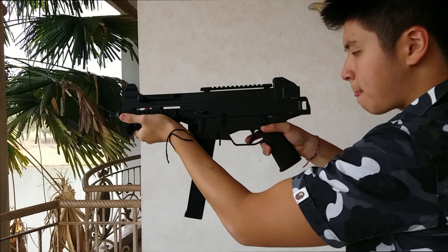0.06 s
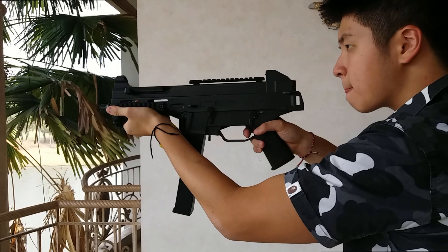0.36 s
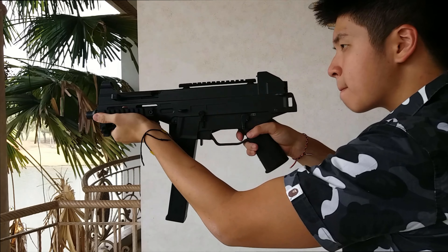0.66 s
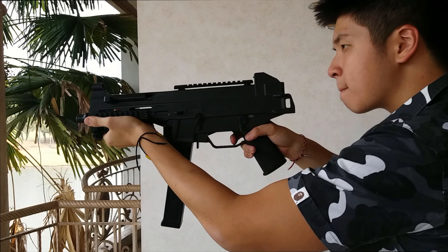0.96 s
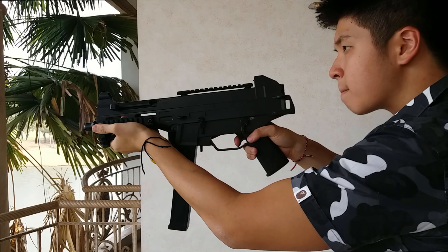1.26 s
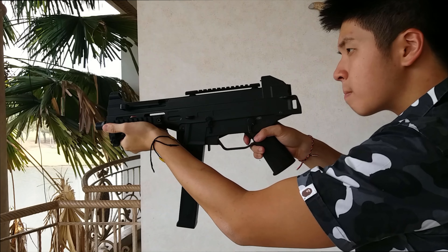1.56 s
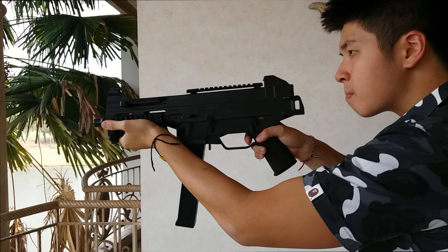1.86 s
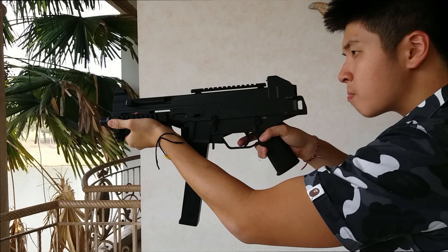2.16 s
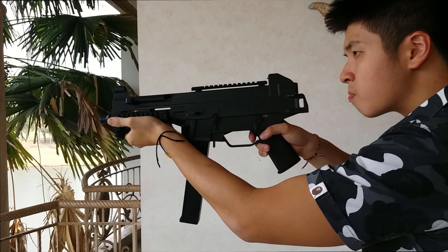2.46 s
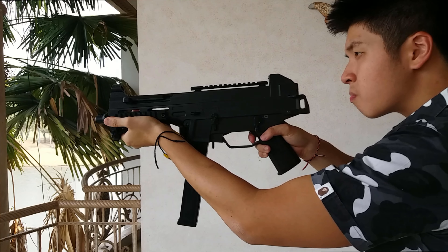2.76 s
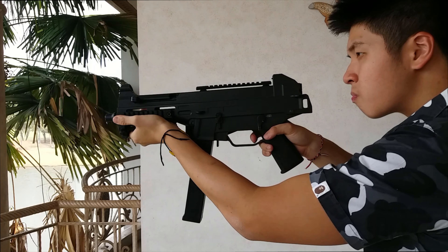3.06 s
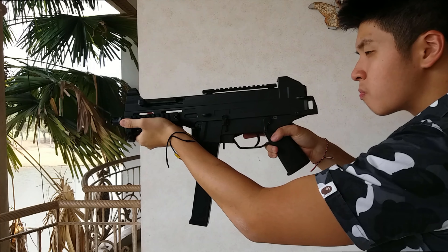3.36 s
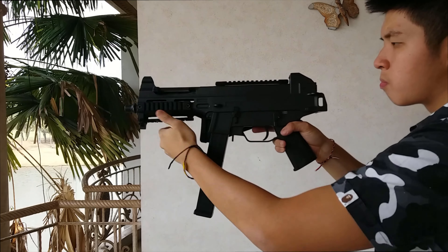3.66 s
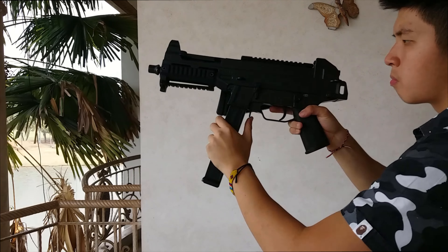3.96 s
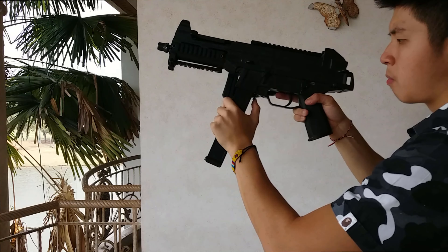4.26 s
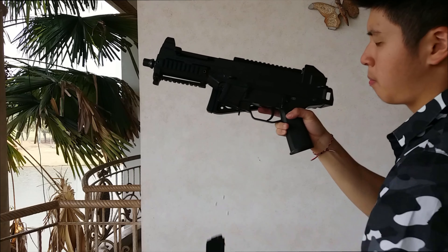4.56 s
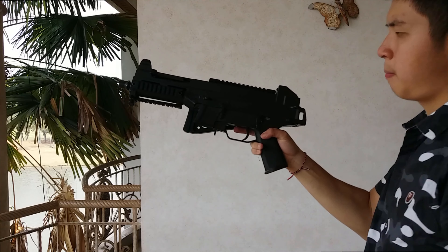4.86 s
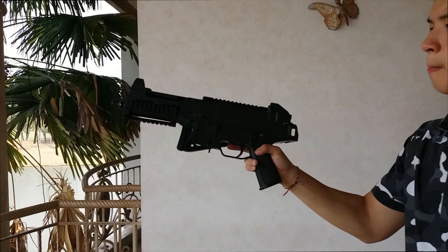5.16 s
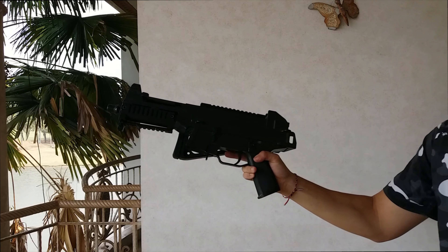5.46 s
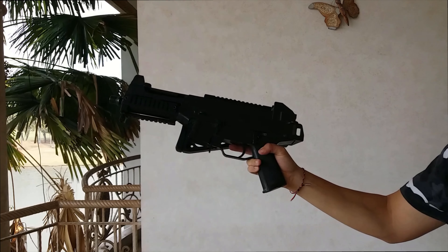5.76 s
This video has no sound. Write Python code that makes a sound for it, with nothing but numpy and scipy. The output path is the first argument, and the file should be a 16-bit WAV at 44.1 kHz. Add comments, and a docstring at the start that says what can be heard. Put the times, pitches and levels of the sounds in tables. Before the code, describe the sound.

A small motor whines up and an electric airsoft gun rattles off three quick bursts of popping, clacking shots, with short echoes from nearby porch walls. Muzzle air bumps the close microphone, and the last burst sounds sharper as the gun fires empty. Then comes a plastic click as the magazine is removed, a brief rattle of spilling pellets and a few stray ticks, while a far rumble swells softly.

```python
"""On a hard-walled porch, an electric airsoft gun fires three bursts, running empty early in the third. For
each shot, whining gears wind a spring back, the spring slams a piston home with a sharp crack, and air pops
from the muzzle behind each pellet; some puffs of air thump the microphone. Then the magazine clicks out and
loose pellets spill and tick. The walls echo the gun, and a distant rumble swells."""
import sys
import numpy as np
from scipy import signal
from scipy.fft import rfft, irfft
from scipy.io import wavfile
from scipy.ndimage import uniform_filter1d

SR = 44100
rng = np.random.default_rng(int(sys.argv[2]) if len(sys.argv) > 2 else 0)


def waveform_to_disk(signal):
    """Save audio, clipped to [-1, 1], as 16-bit WAV at the path in sys.argv[1]."""
    frames = np.transpose(np.atleast_2d(signal))
    scaled = np.clip(frames, -1, 1) * 32767
    samples = np.round(scaled).astype(np.int16)
    wavfile.write(sys.argv[1], SR, samples)


N = 260631

# the piston slamming home, about nine times a second in a burst: (time [s], level [dB])
SLAMS = [(0.549, -17), (0.6588, -18), (0.764, -18.5), (0.8688, -18.5), (0.974, -19.5), (1.4355, -18.5),
         (1.5515, -19.5), (1.6576, -19), (1.7634, -20), (1.8691, -21), (1.976, -21.5), (2.0841, -23),
         (2.4612, -24), (2.5738, -21.5), (2.681, -22), (2.7883, -21.5), (2.896, -22), (3.004, -22),
         (3.113, -22)]
# trigger pulls: (time [s], click level [dB], motor level [dB], pitch of the free-running gears [Hz])
TRIGGER_PULLS = [(.417, -53, -22, 1251), (1.354, -53.5, -32.5, 1212), (2.33, -48, -34, 1181)]


def shots(empty_from_s=2.52, barrel_s=.0058, flight_s=.0215, bounce_s=.014):
    """The piston slams, the spring twangs, a pellet pops out and hits a target. Returns noise and tones."""
    # tone colours, each (frequency [Hz], level [dB])
    crack_colour = [(300, -20.5), (1500, 1.5), (3000, 2.5), (4500, -1), (6000, -3.5), (7300, -7), (8400, 1),
                    (12000, 1), (16000, -7.5)]  # the sharp crack of the piston striking home
    loaded_colour = [(50, -24.5), (110, -0.5), (160, -1), (230, -1.5), (380, -2), (490, 4.5), (650, -4),
                     (950, 5.5), (1500, -2.5), (2500, 0), (4000, -7.5), (8000, -35)]  # the piston landing on a cushion of air
    empty_colour = [(50, -47.5), (140, -17), (290, -8.5), (520, -5), (700, -2), (880, -5.5), (1150, -2),
                    (1450, -7.5), (2000, -3.5), (3000, -12), (4500, -13.5), (8000, -27)]  # the piston landing bare
    pop_colour = [(30, -50.5), (70, -18), (130, 11.5), (200, 2.5), (280, 5), (400, 2), (540, 8.5), (700, 1),
                  (1000, 5.5), (1600, 0.5), (3000, -9.5), (8000, -38)]  # air popping out behind the pellet
    # ringing parts, each (pitch [Hz], level [dB], time to fade by 60 dB [s])
    spring_notes = [(117, -9.5, 0.41), (151, -6.5, 0.33), (309.8, 3, 0.26), (469.6, -3, 0.22),
                    (876, -10, 0.43), (1016, -11, 0.25), (1370, -18.5, .3), (1870, -7.5, 0.59),
                    (2333, -23, 0.26), (2710, -19, 0.36), (3390, -8, .3)]
    body_notes = [(522, 2, 0.1), (869, -0.5, 0.21), (1098, 2.5, 0.12), (1157, 0.5, 0.16), (1830, -11, .12)]
    target_notes = [(490, 0, .05), (550, -7, .04), (920, -9, .06)]
    rebound_notes = [(929, 2.5, 0.023), (1053, -4.5, .04)]  # a second surface that the pellet bounces onto
    noise, tones = np.zeros((2, N))
    # the same parts collide each time, so these sounds are made once
    cushioned, bare = impact(loaded_colour, decay_s=.023), impact(empty_colour, decay_s=.003)
    spring, body = ring(spring_notes, rise_s=.019), ring(body_notes, rise_s=.0089)
    target, rebound = ring(target_notes, rise_s=.022), ring(rebound_notes, rise_s=.0033)
    pop = impact(pop_colour, decay_s=.0015)
    t = seconds(440)
    for s, db in SLAMS:
        loaded = s < empty_from_s
        cushion = .87 if loaded else .1  # how much the air behind a pellet brakes the piston, 0 to 1
        hardness = 1 - cushion
        crack_db, twang_db = db - 4.5, db - (10.5 if loaded else 23)
        # the piston rushes forward; with no cushion it scrapes in fast
        swell = rng.standard_normal(len(t)) * (t / t[-1]) ** .25
        rush = set_energy(colour(np.pad(swell, (0, 4 * len(t))), loaded_colour))
        add(noise, s - t[-1], cushion * amp(db - 13) * rush)
        add(noise, s - .0035, hardness * amp(crack_db - 15) * impact(crack_colour, decay_s=.0051))
        # it lands: a crack, chattering parts and the slam itself
        add(noise, s, amp(crack_db - 7) * impact(crack_colour, decay_s=.00032 + .0011 * hardness))
        add(noise, s, amp(crack_db - 15) * impact(crack_colour, decay_s=.013))
        add(noise, s, cushion * amp(db - 10) * cushioned + hardness * amp(db - 6) * bare)
        add(tones, s, amp(twang_db) * spring)
        add(tones, s, hardness * amp(db - 4) * body)
        # the pellet leaves, hits and bounces
        add(tones, s + barrel_s, cushion * amp(db - 3) * pop)
        add(tones, s + flight_s, cushion * amp(db - 8) * target)
        add(noise, s + flight_s, cushion * amp(crack_db - 14) * impact(crack_colour, decay_s=.014))
        add(tones, s + flight_s + bounce_s, cushion * amp(db - 11) * rebound)
    return noise, tones


def motor():
    """The motor spins up, winds the spring between shots and coasts to rest. Returns grind and whine."""
    # gears running on after a burst: (time [s], hold [s], starting pitch [Hz], level [dB])
    coasts = [(.99, 0.032, 1903, -27.5), (2.196, .005, 1797, -43.5)]
    out = np.zeros((2, N))
    for s, _, db, free_hz in TRIGGER_PULLS:
        first_shot = min(shot for shot, _ in SLAMS if shot > s)
        add(out, s, amp(db) * spin_up(first_shot - s, free_hz))
    for (s, db), (next_s, _) in zip(SLAMS, SLAMS[1:]):
        if next_s - s < .2:  # still the same burst
            add(out, s, amp(db - 15) * winding(next_s - s))
    for s, hold_s, hz, db in coasts:
        add(out, s, amp(db) * coast(hold_s, hz))
    return out


def spin_up(length_s, free_hz, run_up_s=.026, load_s=.049, sag_hz_per_s=7000, strain_db=2):
    """The motor gets louder and its brushes hiss as it speeds up; then the tightening spring slows it."""
    t = np.arange(0, length_s, 1 / SR)
    # hiss of the motor's brushes: (frequency [Hz], level [dB])
    brush_colour = [(1500, -16.5), (4000, 1.5), (7000, -3.5), (9000, 1), (16000, -1.5)]
    sag_hz = sag_hz_per_s * np.maximum(t - length_s + load_s, 0)
    speed = np.maximum(1 - .8 * np.exp(-t / run_up_s) - sag_hz / free_hz, .1)
    grind, whine = gears(free_hz * speed, whine_db=5.5, overtone_db=-12.5, grind_db=-10.5, idler_db=-19)
    hiss = amp(-18.5) * speed * normalise(colour(rng.standard_normal(len(t)), brush_colour))
    sound = np.array([(grind + hiss) * speed ** 2, whine * speed ** 4])
    return sound * amp(strain_db * (t / length_s - 1.5)) * let_go(t, length_s)


def winding(length_s, race_hz=2020, load_s=.055, sag_hz_per_s=17500, whine_rise_db=7):
    """Between two shots the gears race, then slow and whine louder as they squeeze the spring."""
    t = np.arange(0, length_s, 1 / SR)
    pace, drag, bite = rng.uniform(-1.016, 1, 3)  # no two cycles are quite alike
    sag_hz = sag_hz_per_s * (1 + .14 * drag) * np.maximum(t - length_s + load_s, 0)
    hz = np.maximum(race_hz - sag_hz, 100) * (1 + .04 * pace)
    grind, whine = gears(hz, whine_db=4.5, overtone_db=-12, grind_db=-6.5, idler_db=-15)
    whine *= amp(whine_rise_db * (t / length_s - 1) + 2 * bite)
    loudness = envelope(t, rise_s=.033, hold_s=.057, fade_db_per_s=498)
    return np.array([grind, whine]) * loudness * let_go(t, length_s)


def coast(hold_s, start_hz, slowing_s=.16):
    """With the power off, the gears run down and their pitch falls."""
    t = seconds(8192)
    hz = start_hz * np.exp(-t / slowing_s)
    sound = gears(hz, whine_db=-5, overtone_db=-23.5, grind_db=-7, idler_db=-16)
    return sound * envelope(t, rise_s=.012, hold_s=hold_s, fade_db_per_s=421)


def let_go(t, length_s, release_s=.026, drop_db=-15):
    """The gears turn quieter as they let go of the piston, just before it lands."""
    return amp(drop_db * np.clip(2 * (t - length_s + release_s) / release_s, 0, 1))


def gears(hz, whine_db, overtone_db, grind_db, idler_db, idler_ratio=.61):
    """Teeth meeting hz times a second grind and whine; a slower gear, the idler, hums below."""
    # the grinding teeth: (frequency [Hz], level [dB])
    grind_colour = [(30, -62), (100, -19.5), (500, -9.5), (900, -1.5), (2200, -4), (3500, -10), (7000, -24),
                    (9000, -22), (16000, -27.5)]
    # how well the gun's shell gives off the whine: (pitch [Hz], level [dB])
    shell_boost = [(500, 0), (900, 3.5), (1160, -5.5), (1300, -2.5), (1440, 8), (1580, -3.5), (2100, -9.5)]
    waver, bite, wobble = (wander(len(hz), smooth_samples=200) for _ in range(3))
    slack = wander(len(hz), smooth_samples=90)  # loose teeth make the whine rasp
    hz = hz * (1 + .014 * waver)
    angle = 2 * np.pi * np.cumsum(hz) / SR + .25 * slack
    overtones = amp(overtone_db) * (np.sin(2 * angle) + .86 * np.sin(3 * angle))
    whine = amp(look_up(shell_boost, hz)) * np.sin(angle) + overtones
    idler = amp(idler_db + 3 * wobble) * np.sin(idler_ratio * angle)
    whine = whine * amp(2.3 * bite) + idler  # the teeth bite unevenly
    grind = colour(rng.standard_normal(len(hz)) * (1 + np.cos(angle)), grind_colour)  # a pulse per tooth
    return np.array([amp(grind_db) * normalise(grind), amp(whine_db) * normalise(whine)])


def puffs(first_swing_s=.0011, fade_s=.013, right_db=-11, low_cut_hz=40):
    """A puff of air shoves the left microphone hard; the pressure swings back ever more slowly."""
    # muzzle air reaching the microphone: (time [s], level [dB])
    arrivals = [(1.8685, -1), (2.5739, -2), (2.681, -8.5), (2.7876, -24.5), (2.896, -20.5)]
    out, t = np.zeros(N), seconds(8192)
    fade = .51 * np.exp(-t / fade_s) + .66 * np.exp(-t / .0012)
    swing = np.sin(np.pi * np.sqrt(t / first_swing_s)) * fade
    for s, db in arrivals:
        add(out, s, amp(db) * swing)
    low_cut = signal.butter(1, low_cut_hz, "high", fs=SR, output="sos")
    return signal.sosfilt(low_cut, out) * amp([[0], [right_db]])


def clicks():
    """Trigger, magazine catch and stray pellets each mix a dull plastic knock with a short, bright tick."""
    # catch and pellets: (time [s], level [dB], hardness [0 knock to 1 tick], chatter time [s])
    contacts = [(3.8368, -74, 0.82, .001), (3.8772, -76, 0.47, .001), (4.0357, -71.5, 0.63, .002),
                (4.3595, -58, .4, .002), (4.392, -51, 0.1, 0.0069), (4.4162, -33, 0.091, 0.0014),
                (4.4477, -53, 0.074, .002), (4.6504, -41, 0.38, .003), (4.671, -41, 0.64, 0.0027),
                (4.873, -48.5, 0.38, 0.00087), (4.9138, -48, 0.38, 0.0025), (4.9474, -47.5, .95, 0.00069),
                (4.9575, -37.5, 0.74, 0.006), (4.9692, -43.5, 0.63, 0.0022), (5.821, -37, 0.42, 0.005)]
    # a dull and a hard contact, each (frequency [Hz], level [dB])
    knock_colour = [(40, -41), (200, -15.5), (500, -7.5), (900, -4), (1400, -2), (2000, 1), (2450, 1),
                    (3000, -5.5), (4200, -6), (4900, -4.5), (6000, -8.5), (7200, -13.5), (9000, -10.5),
                    (16000, -23.5)]
    tick_colour = [(300, -32), (1500, -7), (4000, 3.5), (6500, -8), (9000, 0), (13000, 1.5), (16000, -2.5)]
    # the plastic shell ringing: (pitch [Hz], level [dB], time to fade by 60 dB [s])
    shell_notes = [(930, -8, .035), (2560, 0, .035), (4662, -5, .02)]
    out, shell = np.zeros(N), ring(shell_notes, rise_s=.00059)
    trigger_clicks = [(s, db, .05, .0025) for s, db, _, _ in TRIGGER_PULLS]
    for s, db, hardness, chatter_s in trigger_clicks + contacts:
        knock, tick = impact(knock_colour, chatter_s), impact(tick_colour, .55 * chatter_s)
        add(out, s, amp(db) * set_energy((1 - hardness) * knock + hardness * tick))
        add(out, s, amp(db - 5) * (1 - hardness) ** 2 * shell)
    return out


def spill(hits_per_s=600):
    """Pellets pushed out by the magazine spring collide in clumps and ring the hollow they leave."""
    # pellets hitting each other: (frequency [Hz], level [dB])
    pellet_colour = [(410, -58), (700, -34), (1310, -14.5), (1650, -9.5), (2100, -10.5), (2490, -5),
                     (3320, -5.5), (4050, -2.5), (5260, -6), (6740, -14.5), (10100, -9.5), (15000, -17),
                     (16000, -33)]
    # the note of the emptying magazine: (time [s], pitch [Hz])
    hollow_pitch = [(4.47, 1930), (4.51, 1840), (4.55, 1630), (4.6, 1660), (4.63, 1670), (4.66, 1620),
                    (4.73, 2000), (4.84, 2070)]
    # the magazine slides out, spills, then trickles: (time [s], rise [s], hold [s], level [dB])
    rattles = [(4.35, 0.021, 0.08, -44.5), (4.445, 0.079, 0.16, -27.5), (4.86, 0.034, 0.026, -56)]
    t = seconds(N)
    hits = (rng.random(N) < hits_per_s / SR) * rng.choice([-1, 1], N)
    strength = amp(3 * np.minimum(rng.exponential(1, N), 3))
    clumps = amp(1.5 * wander(N, smooth_samples=600))
    rattle = normalise(colour(hits * strength * clumps, pellet_colour))
    hollow = normalise(resonate(rattle, np.interp(t, *np.transpose(hollow_pitch)), width_hz=260))
    flow = sum(amp(db) * envelope(t - s, rise_s, hold_s, fade_db_per_s=165)
               for s, rise_s, hold_s, db in rattles)
    return amp(-4) * flow * normalise(rattle + amp(-7) * hollow)


def porch(x, echo_db, tail_db, poses=4, split_hz=2940, bass_sway_hz=.7045, treble_sway_hz=2.3):
    """Direct sound, wall echoes and a fading tail; scatter and tail shift as the gun sways between poses."""
    # nearby walls and ceiling: (delay [s], level [dB], extra delay on the right [s])
    echoes = [(.0059, 0, .0001), (.0069, 2, .0001), (.0089, -1, .0003), (0.0107, -4, -0.0073),
              (0.0135, -4, -.0002), (0.0169, 0.5, 0)]
    early, scatter = np.zeros((2, 2048)), np.zeros((poses, 2, 2048))
    early[:, 0] = 1  # the direct sound
    # walls mirror the low notes and scatter the high ones
    pulse = signal.unit_impulse(256)
    mirrored = colour(pulse, [(200, 2.5), (1300, -.5), (3000, -9.5), (14000, -15.5)])
    rough_wall = colour(pulse, [(300, -29.5), (1300, -4), (3000, .5), (14000, -4)])
    for delay_s, db, right_lag_s in echoes:
        for ear in (0, 1):
            arrival_s, gain = delay_s + ear * right_lag_s, amp(db + echo_db)
            add(early[ear], arrival_s, gain * mirrored)
            for pose in scatter:
                add(pose[ear], arrival_s, gain * np.convolve(clatter(decay_s=.00064, size=256), rough_wall))
    out = apply_echoes(x, early)
    bass = signal.sosfiltfilt(signal.butter(2, split_hz, fs=SR, output="sos"), x + 1e-18)
    treble = x - bass
    for k, pose in enumerate(scatter):
        part = bass * pose_share(k, bass_sway_hz, poses) + treble * pose_share(k, treble_sway_hz, poses)
        out += apply_echoes(part, pose) + amp(tail_db) * echo_tail(part)
    return out


def pose_share(k, sway_hz, poses):
    """Fades pose k in and out as the gun sways through all of them."""
    return np.sin(np.pi / 2 * np.minimum((poses * sway_hz * seconds(N) - k) % poses, 2))


def echo_tail(x, start_s=.0064, build_s=.0021):
    """Countless echoes blur into one tail, each frequency dying at its own speed."""
    # how long the porch rings: (frequency [Hz], time to fade by 60 dB [s])
    fade_times = [(150, 0.33), (400, 0.32), (1000, 0.41), (2800, 0.41), (7000, 0.38), (15000, 0.28)]
    t = seconds(32768)
    hz, when, bands = signal.stft(surrounding_noise(len(t)), SR, nperseg=256)
    bands *= amp(-60 * when / look_up(fade_times, hz)[:, None])
    tail = signal.istft(bands, SR, nperseg=256)[1][:, :len(t)]
    tail *= 1 - np.exp(-np.maximum(t - start_s, 0) / build_s)
    return apply_echoes(x, tail / np.linalg.norm(tail[0]))


def outdoors():
    """A far rumble swells and sinks over faint, steady air."""
    # the rumble and the air, each (frequency [Hz], level [dB])
    rumble_colour = [(18, -66.5), (30, -39), (48, -42), (63, -21), (79, -5.5), (194, 2), (252, -3.5),
                     (473, -8.5), (569, -13.5), (2610, -24), (3310, -28.5), (7270, -41), (14800, -40.5),
                     (16000, -49)]
    air_colour = [(24, -62.5), (40, -40), (81, -2), (176, -26.5), (209, -14.5), (392, -9), (733, -7),
                  (896, -12), (1150, -14), (1850, -15), (16000, -42.5)]
    # the rumble's rise and fall: (time [s], level [dB])
    rumble_levels = [(0, -51), (1.25, -48), (2.3, -55.5), (3.35, -65), (3.77, -63), (3.87, -53.5),
                     (4.3, -56), (4.47, -44), (5.9, -44.5)]
    rumble = normalise(np.array([colour(side, rumble_colour) for side in surrounding_noise(N)]))
    air = normalise(np.array([colour(side, air_colour) for side in surrounding_noise(N)]))
    return amp(1 + np.interp(seconds(N), *np.transpose(rumble_levels))) * rumble + amp(-60) * air


def surrounding_noise(size):
    """Noise from all sides at two close microphones: alike in the bass, unrelated in the treble."""
    # how alike left and right are: (frequency [Hz], likeness [0 to 1])
    likeness = [(100, 0.95), (300, 0.87), (600, 0.52), (1200, 0.074), (2500, 0.15), (16000, 0.018)]
    left, other = rfft(rng.standard_normal((2, size)))
    same = look_up(likeness, np.fft.rfftfreq(size, 1 / SR))
    right = same * left + np.sqrt(1 - same ** 2) * other
    return irfft(np.array([left, right]), size)


def impact(points, decay_s):
    """A clatter coloured by the part that is struck."""
    return set_energy(colour(clatter(decay_s), points))


def clatter(decay_s, size=4096):
    """A burst of tiny contacts that holds all frequencies equally."""
    burst = rfft(rng.standard_normal(size) * np.exp(-seconds(size) / decay_s), 2 * size)
    return irfft(burst / (abs(burst) + 1e-12))[:size]


def ring(notes, rise_s, longest_s=.4):
    """A struck part's notes start softly and die away, none ringing longer than longest_s."""
    t = seconds(16384)
    tones = sum(amp(db - 60 * t / min(fade_s, longest_s)) * np.sin(2 * np.pi * hz * t)
                for hz, db, fade_s in notes)
    return set_energy(tones * (1 - np.exp(-t / rise_s)))


def resonate(x, hz, width_hz):
    """Picks out a narrow band around the moving pitch hz, as a hollow does."""
    turn = np.exp(2j * np.pi * np.cumsum(hz) / SR)
    feedback = np.exp(-np.pi * width_hz / SR)
    return 2 * (turn * signal.lfilter([1 - feedback], [1, -feedback], x / turn + 1e-18)).real


def colour(x, points, size=4096):
    """Shapes a sound by (frequency [Hz], level [dB]) points, with no ringing ahead of it."""
    log_gain = np.log(amp(look_up(points, abs(np.fft.fftfreq(size, 1 / SR)))))
    taps = np.fft.ifft(np.exp(np.conj(signal.hilbert(log_gain)))).real[:size // 2]
    return signal.oaconvolve(x, taps)[:len(x)]


def apply_echoes(x, pattern):
    """Plays a sound through a left and a right echo pattern."""
    return signal.oaconvolve(x[None], pattern, axes=1)[:, :N]


def envelope(t, rise_s, hold_s, fade_db_per_s):
    """A loudness curve that rises, holds and fades."""
    return np.clip(t / rise_s, 0, 1) ** 1.5 * amp(-fade_db_per_s * np.maximum(t - rise_s - hold_s, 0))


def wander(size, smooth_samples):
    """A smoothed random drift around zero."""
    return normalise(uniform_filter1d(rng.standard_normal(size), smooth_samples))


def look_up(points, hz):
    """Reads between a table's rows, with every octave equally wide."""
    row_hz, value = np.transpose(points)
    return np.interp(np.log(hz + 1), np.log(row_hz + 1), value)


def add(mix, s, sound):
    """Mixes a sound in at s seconds."""
    part = mix[..., max(round(s * SR), 0):][..., :sound.shape[-1]]
    part += sound[..., :part.shape[-1]]


def amp(db):
    """Turns decibels into a multiplier."""
    return 10 ** (np.asarray(db) / 20)


def normalise(x):
    """Scales to an average strength (rms) of 1."""
    return x / np.sqrt(np.mean(x ** 2) + 1e-20)


def set_energy(x):
    """Gives a short sound the energy of 25 ms at strength 1."""
    return x * np.sqrt(.025 * SR / (np.sum(x ** 2) + 1e-20))


def seconds(size):
    """The time of each sample."""
    return np.arange(size) / SR


def scene():
    """The gun on the porch, puffs on the microphone and the background."""
    shot_noise, shot_tones = shots()
    grind, whine = motor()
    noisy = porch(shot_noise + grind, echo_db=.5, tail_db=7.5)
    ringing = porch(shot_tones + whine, echo_db=-16.5, tail_db=-6)
    handling = porch(clicks() + spill(), echo_db=-6, tail_db=5)
    return noisy + ringing + handling + puffs() + outdoors()


def record(dry):
    """Each microphone colours the treble its own way; loud peaks clip and the very top is cut off."""
    left = colour(dry[0], [(1000, -1.05), (4500, 1), (6500, 2.5), (8300, -3), (10500, -3), (14000, 4)])
    right = colour(dry[1], [(1000, -2), (4500, -.5), (6500, -1), (8300, 4.5), (10500, 1.5), (14000, 1)])
    clipped = np.clip([left, right], -.9, .9)
    high_cut = signal.firwin(255, cutoff=15900, window=("kaiser", 8), fs=SR)
    return signal.oaconvolve(clipped, high_cut[None], "same")


dry = scene()
out = record(dry)
waveform_to_disk(out)
```